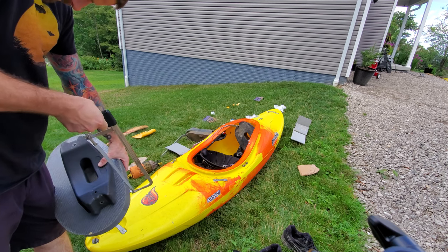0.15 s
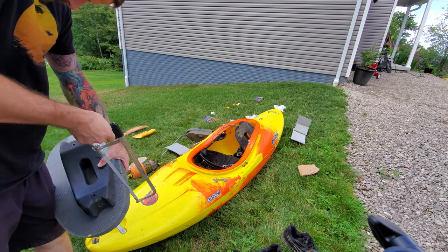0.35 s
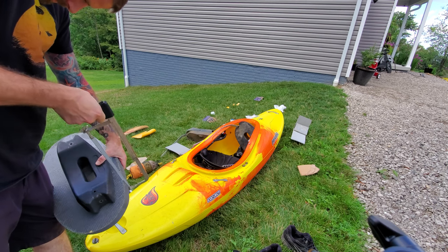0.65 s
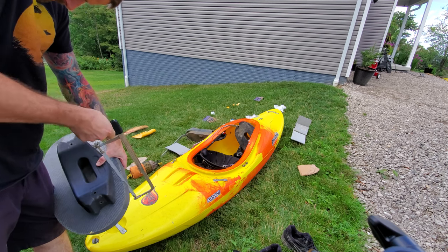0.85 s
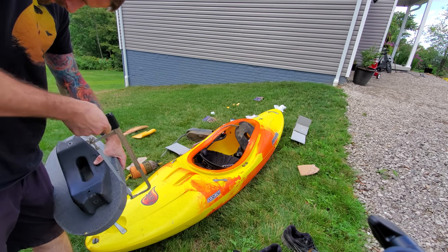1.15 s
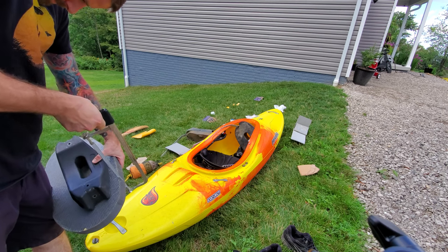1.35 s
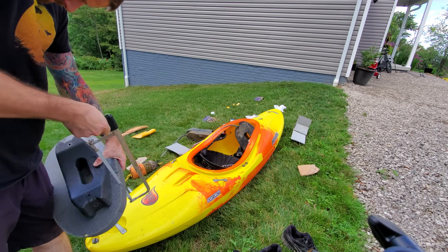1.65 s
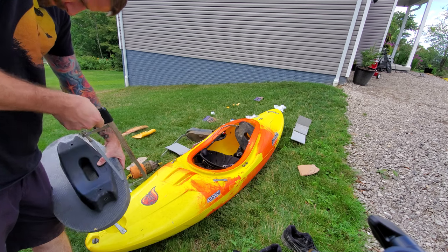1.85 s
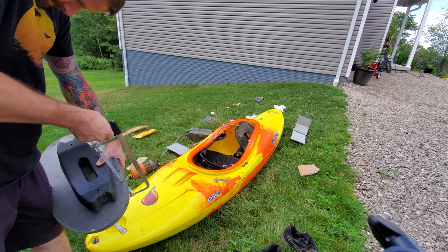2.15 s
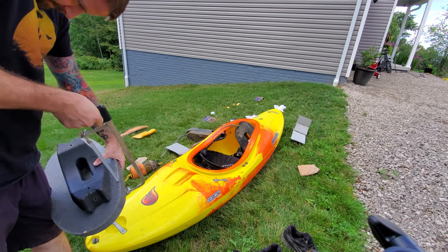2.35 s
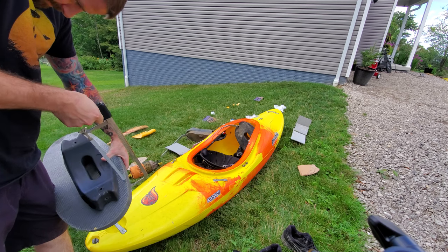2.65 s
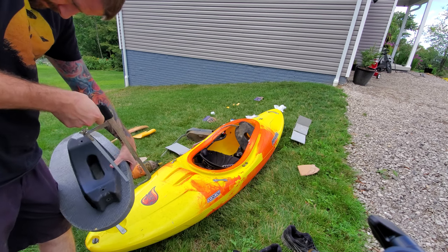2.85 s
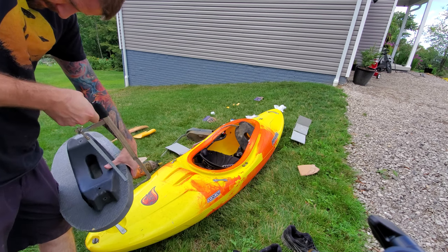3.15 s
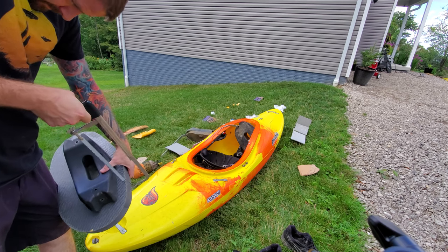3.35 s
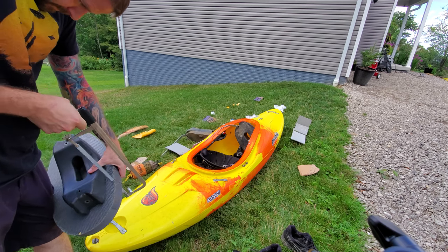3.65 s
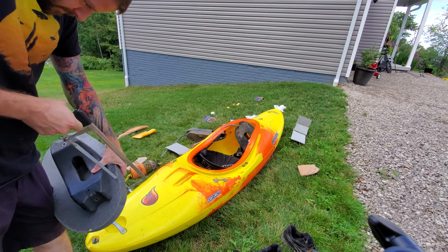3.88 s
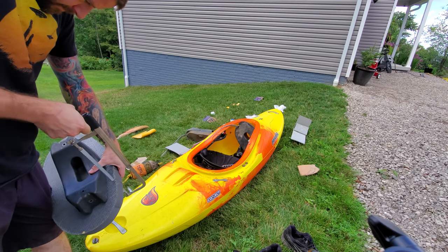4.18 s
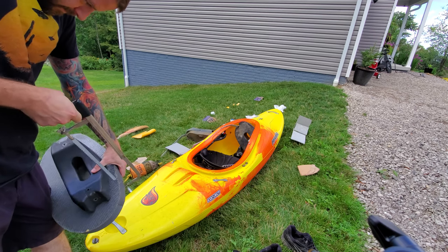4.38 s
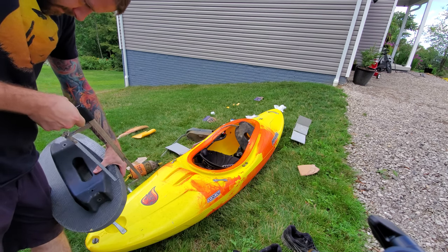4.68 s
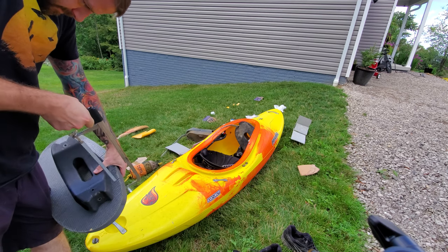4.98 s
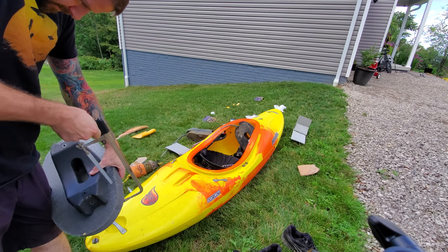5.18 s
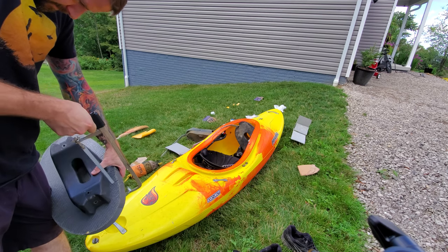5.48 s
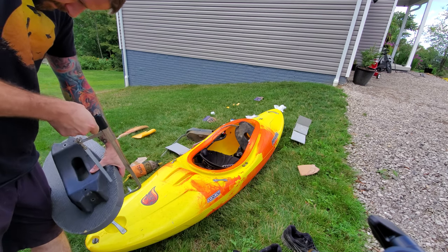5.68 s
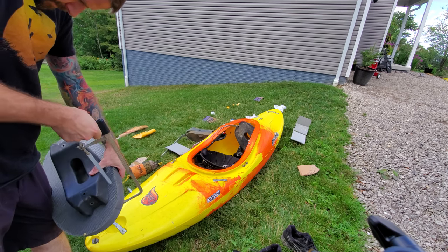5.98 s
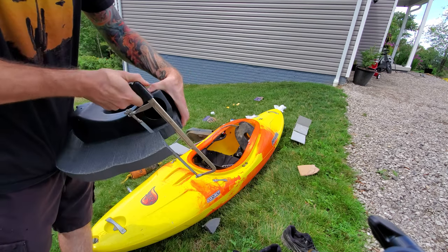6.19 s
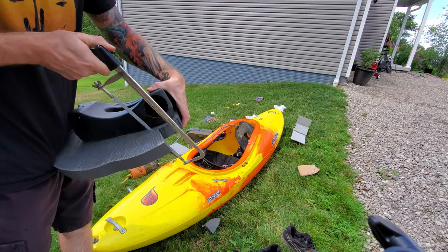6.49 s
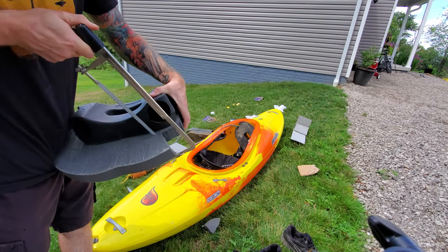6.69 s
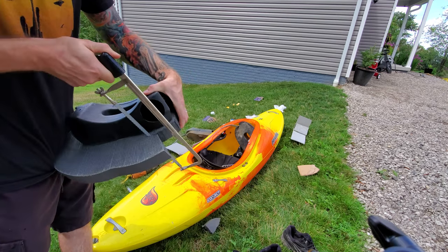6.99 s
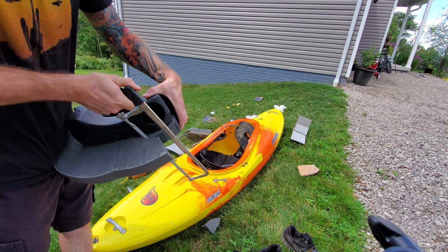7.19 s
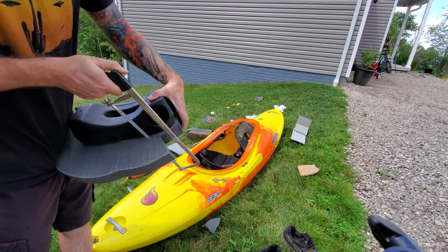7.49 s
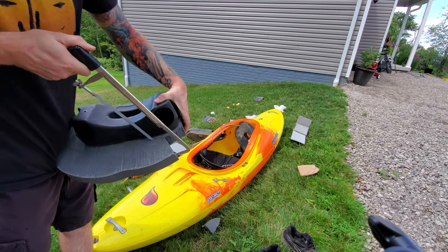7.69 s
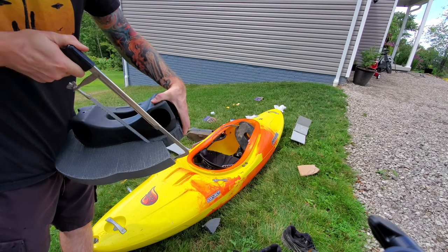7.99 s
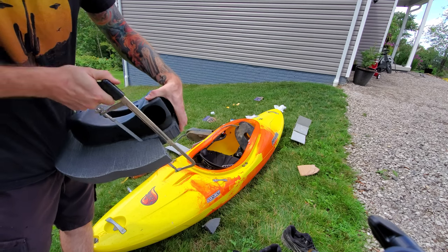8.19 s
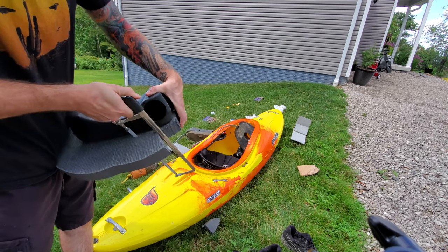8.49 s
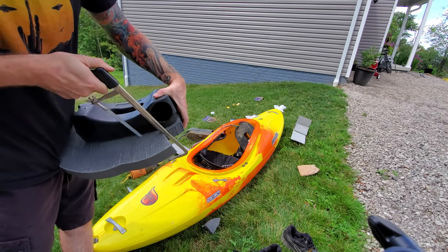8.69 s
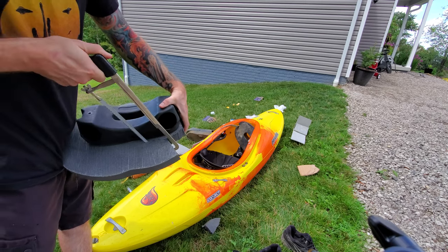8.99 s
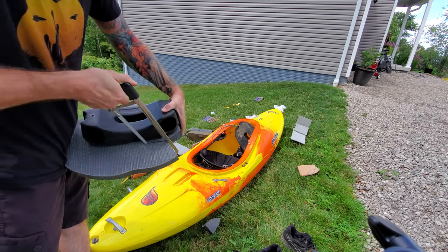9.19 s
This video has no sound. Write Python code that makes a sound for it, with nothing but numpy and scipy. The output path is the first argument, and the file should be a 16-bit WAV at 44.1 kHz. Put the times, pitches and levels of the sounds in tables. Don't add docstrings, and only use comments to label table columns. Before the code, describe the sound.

A hacksaw rasps through a hollow plastic block in quick strokes, pauses, resumes, then grinds slower and rougher with snapping chips and one short squeal.

```python
import sys
import numpy as np
from scipy import signal
from scipy.fft import rfft, irfft, next_fast_len
from scipy.io import wavfile
from scipy.ndimage import uniform_filter1d

SR = 44100
rng = np.random.default_rng(int(sys.argv[2]) if len(sys.argv) > 2 else 0)


def transcribe(u):
    v = np.clip(np.atleast_2d(u).T, -1, 1)
    q = np.round(v * 32767).astype(np.int16)
    wavfile.write(sys.argv[1], SR, q)


def attenuation_scalar(level_db):
    decades = np.asarray(level_db, float) / 20
    return 10 ** decades


N = 411894
TURNED_S = 6.1

# start_s, crest_s, end_s, hiss_db (chips), drone_db (block)
FIRST_BOUT = [(.026, 0.1, .176, -38.5, -33), (0.186, 0.289, .345, -33.5, -24),
              (0.455, 0.53, 0.5994, -35, -31), (0.653, 0.752, .805, -32.5, -26),
              (0.859, 0.932, 1.013, -35.5, -29.5), (1.038, 1.118, 1.19, -33, -26),
              (1.257, 1.38, 1.47, -39.5, -34.5), (1.523, 1.597, 1.665, -30, -25),
              (1.724, 1.801, 1.871, -35, -30.5), (1.937, 2.011, 2.085, -28, -23.5),
              (2.288, 2.354, 2.416, -35, -36)]
# start_s, crest_s, end_s, hiss_db, drone_db
SECOND_BOUT = [(3.47, 3.575, 3.721, -32, -31), (3.803, 3.885, 3.95, -36.5, -34),
               (4.022, 4.105, 4.161, -29, -28.5), (4.196, 4.285, 4.335, -28.5, -28),
               (4.355, 4.454, 4.505, -27, -28.5), (4.536, 4.625, 4.675, -33, -30.5),
               (4.722, 4.82, 4.868, -25.5, -30), (4.912, 4.96, 5.046, -37, -34.5),
               (5.07, 5.172, 5.22, -26, -29), (5.262, 5.341, 5.396, -35.5, -36.5),
               (5.411, 5.502, 5.555, -30, -32.5), (5.488, 5.557, 5.618, -27, -32),
               (5.661, 5.713, 5.791, -36.5, -40), (5.841, 5.917, 5.995, -33.5, -31)]
# start_s, crest_s, end_s, hiss_db, drone_db
TURNED_BOUT = [(6.301, 6.43, 6.49, -34.5, -30), (6.552, 6.637, 6.711, -26, -26.5),
               (6.868, 7.186, 7.26, -35, -32), (7.442, 7.53, 7.625, -29.5, -29),
               (7.557, 7.726, 7.785, -33.5, -29), (7.88, 8.299, 8.35, -33, -30.5),
               (8.458, 8.633, 8.675, -33.5, -34.5), (8.74, 8.778, 8.906, -34.5, -33.5),
               (9.122, 9.187, 9.29, -35, -31), (9.303, 9.341, 9.4, -26, -26)]


def evened(x):
    return x / np.sqrt(np.mean(x ** 2) + 1e-20)


def curve(rows, column=1):
    rows = np.array(rows)
    return np.interp(np.arange(N) / SR, rows[:, 0], rows[:, column])


def colour(x, points, share=1, late_ms=0):
    size = next_fast_len(N + 4096)
    hz = np.fft.rfftfreq(size, 1 / SR)
    point_hz, point_db = np.transpose(points)
    gain = attenuation_scalar(share * np.interp(np.log(hz + 1), np.log(np.add(point_hz, 1)), point_db))
    delay = np.exp(-2j * np.pi * hz * late_ms / 1000)
    return irfft(rfft(x, size) * gain * delay, size)[..., :N]


def ring(x, hz, width):
    return signal.lfilter(*signal.iirpeak(hz, hz / width, fs=SR), x)


def resonate(x, hz, width):
    turn = np.exp(2j * np.pi * np.cumsum(hz * np.ones(len(x))) / SR)
    r = np.exp(-np.pi * width / SR)
    return 2 * (turn * signal.lfilter([1 - r], [1, -r], x / turn)).real


def wander(seconds):
    size = max(round(seconds * SR), 1)
    smooth = uniform_filter1d(rng.standard_normal(N), size)
    return evened(uniform_filter1d(smooth, size))


def drifting(x, patchy_db):
    z = signal.stft(x, nperseg=256)[2]
    patches = rng.standard_normal(z.shape[-2:])
    patches = uniform_filter1d(patches, size=7, axis=0)
    patches = evened(uniform_filter1d(patches, size=14, axis=1))
    return signal.istft(z * attenuation_scalar(patchy_db * patches), nperseg=256)[1][..., :N]


def add(mix, s, sound):
    part = mix[round(s * SR):][:len(sound)]
    part += sound[:len(part)]


def stroke_levels():
    # attack_s, release_s, set_in_db, share of the crest already in the set-in (0-1), sag_db_per_s
    hiss_shapes = [
        (0.037, .04, -45.5, 0.27, 176),
        (.03, 0.043, -42, .3, 59.5),
        (.02, 0.045, -38, 0.19, 68),
    ]
    drone_shapes = [
        (0.029, 0.046, -37.5, 0.15, 137),
        (0.032, 0.048, -39.5, .4, 70),
        (0.021, 0.053, -34.5, 0.48, 50),
    ]
    # time_s, hiss_lift_db, drone_lift_db
    bites = [(0.049, -2.5, 6), (.285, 2.5, 1.5), (.885, 0, 4), (1.285, -3, -6), (1.14, -1, 3.5),
             (4.1, -1, 1.5), (4.381, 12, 3.5), (4.454, -1.5, 2.5), (4.62, 7.5, -1.5), (4.756, 8, 6.5),
             (5.01, 0.5, 7), (5.15, 0.5, 3.5), (5.177, 4, -1.5), (5.425, 8, -10), (5.474, 11.5, 1.5),
             (5.52, 3, 7), (5.755, -0.5, 9), (5.882, 10, 0.5), (5.947, 9.5, -7),
             (6.33, 0, 5.5), (6.443, 6, 11), (6.572, 2, 4), (6.892, 9, 4), (6.975, 8.5, 3.5),
                    (7.028, 3, 9), (7.065, 10, -2), (7.149, 1, 4.5), (7.193, 13, 5.5), (7.55, 6.5, 8),
                    (7.601, 4.5, 4), (7.638, 5, 2), (7.724, 8.5, 5.5), (7.926, 6.5, 2), (8.013, 9, 6.5),
                    (8.04, 3, 0.5), (8.12, -1, 8), (8.169, 11, 8), (8.216, 7, 5), (8.259, 0.5, 8.5),
                    (8.314, 17, 2), (8.535, -3, 7.5), (9.199, 8, 10)]
    start_db, end_db, silent_db = -59.5, -71.5, -86.5
    fade_s, bite_s = .004, 0.012
    t = np.arange(N) / SR
    levels_db = np.full((2, N), silent_db)
    for bout, *shapes in zip((FIRST_BOUT, SECOND_BOUT, TURNED_BOUT), hiss_shapes, drone_shapes):
        for start, crest, end, *crests_db in bout:
            held = (t > start - fade_s) & (t < end + fade_s)
            for k, (db, (attack, release, set_in_db, share, sag)) in enumerate(zip(crests_db, shapes)):
                begun = min(start + attack, crest - .001)
                ending = max(end - release, crest + .001)
                times = [start - fade_s, start, begun, crest, ending, end, end + fade_s]
                begun_db = set_in_db + share * (db - set_in_db)
                sagged_db = db - sag * (ending - crest)
                shape = [silent_db, start_db, begun_db, db, sagged_db, end_db, silent_db]
                stroke_db = np.interp(t[held], times, shape)
                levels_db[k, held] = np.maximum(levels_db[k, held], stroke_db)
    for s, *lifts_db in bites:
        near = abs(t - s) < 2 * bite_s
        levels_db[:, near] += np.outer(lifts_db, 1 - abs(t[near] - s) / (2 * bite_s))
    return attenuation_scalar(levels_db)


def blade_speed():
    # middle_s, half_length_s, top_tooth_rate_hz, evenness (0-1)
    singing = [(.105, .072, 980, .5), (0.529, .068, 1270, 0.49), (0.932, 0.068, 1300, 0.56),
               (1.345, .09, 730, .68), (1.793, 0.063, 1190, 0.53), (3.873, .065, 850, 0.46),
               (4.262, 0.056, 1040, .47), (4.975, .062, 920, 0.37), (5.719, .062, 910, 0.44),
               (6.372, 0.071, 1150, 0.39), (6.608, 0.044, 1300, 0.79), (7.503, 0.074, 1150, 0.5),
               (7.693, .07, 897, 0.54), (8.546, .08, 1200, 0.47)]
    teeth_per_stroke, arc_share, plain_evenness = 145., .45, 0.31
    creep_hz = 378
    t = np.arange(N) / SR
    rate_hz, evenness = np.full(N, creep_hz), np.zeros(N)
    plain = []
    for start, _, end, *_ in FIRST_BOUT + SECOND_BOUT + TURNED_BOUT:
        if not any(start < row[0] < end for row in singing):
            length = end - start
            plain.append(((start + end) / 2, arc_share * length, teeth_per_stroke / length, plain_evenness))
    for middle, half, top_hz, even in plain + singing:
        near = np.flatnonzero(abs(t - middle) < half)
        arc = top_hz * (1 - .72 * abs((t[near] - middle) / half) ** 1.6)
        faster = arc > rate_hz[near]
        won = near[faster]
        evenness[won] = even * np.where(t[won] < middle, .7, 1)
        rate_hz[won] = arc[faster]
    return rate_hz, np.clip(evenness, 0, 1)


def block(force):
    # pitch_hz, width_hz, level_db
    upright = [(406, 64, -0.5), (516.8, 39, 2), (641, 67, -5.5), (912, 326, -11), (1494, 226, -13.5),
               (1876, 180, -15.5), (494.4, 8.5, -8), (321, 60, -8)]
    # pitch_hz, width_hz, level_db
    turned = [(410, 54, 3.5), (501, 252, -8), (668, 183, -10), (1150, 97, -4.5), (1290, 320, -13.5),
              (2080, 150, -16.5)]
    # pitch_hz, width_hz, level_db
    slack = [(362, 90, -5.5), (533, 185, -6), (790, 290, -10.5), (1137, 160, -3), (1390, 410, -11),
             (1940, 253, -12)]
    # pitch_hz, width_hz, level_db
    lowered = [(472, 61.6, 4), (780, 365, -10.5), (475, 14, -4.5), (1150, 207, -5)]
    lowest = [
        255.,
        350.,
        290.,
    ]
    rested_s, slack_s, lowered_s = 3., 8.4, 9.
    t = np.arange(N) / SR
    poses = [(upright, 0, rested_s, lowest[0]), (upright, rested_s, TURNED_S, lowest[1]),
             (turned, TURNED_S, slack_s, lowest[2]), (slack, slack_s, lowered_s, lowest[2]),
             (lowered, lowered_s, N / SR, lowest[2])]
    halves = np.zeros((2, N))
    for modes, since, until, lowest_hz in poses:
        held = (t >= since) & (t < until)
        push = signal.sosfilt(signal.butter(4, lowest_hz, "high", fs=SR, output="sos"), force[held])
        for k, (hz, width, db) in enumerate(modes):
            halves[k % 2, held] += attenuation_scalar(db) * ring(push, hz, width)
    even, odd = halves
    lean = 0.11 * np.array([even + odd, -even - odd])
    return even - odd, lean


def saw():
    # pitch_hz, level_db
    hiss_upright = [(600, -19), (1700, -17), (2500, -7.5), (3500, -4.5), (4800, -7), (6500, -4),
                    (8000, -15.5), (11000, -8), (14500, -7.5), (16000, -3)]
    # pitch_hz, level_db
    hiss_turned = [(600, -21), (1500, 2.5), (2500, 0.5), (3400, 6.5), (4800, 2), (6500, 3.5), (8000, -3),
                   (11000, -3.5), (14500, 4), (16000, 2)]
    hiss, drone = stroke_levels()
    rate_hz, evenness = blade_speed()
    teeth = np.cumsum(rate_hz * (1 + .08 * wander(0.00384))) / SR
    catches = np.cos(2 * np.pi * teeth) + .3 * np.cos(4 * np.pi * teeth)
    catches = catches * attenuation_scalar(3. * wander(.006))
    tearing = rng.standard_normal(N) * attenuation_scalar(1.82 * wander(0.0073))
    force = 1.17 * evenness * catches + 3.25 * (1 - evenness) * tearing
    body, lean = block(attenuation_scalar(8.0) * drone * force)

    puffs = 1 + 0.25 * np.cos(2 * np.pi * teeth)
    puffs = puffs * attenuation_scalar(1.36 * wander(0.0048) + 0.9 * wander(0.0071))
    chips = drifting(rng.standard_normal((3, N)) * puffs, patchy_db=3.2)
    chips += 0.4 * ring(chips, 3390.0, 640.0)
    turned = np.arange(N) > TURNED_S * SR
    chips = hiss * np.where(turned, evened(colour(chips, hiss_turned)), evened(colour(chips, hiss_upright)))
    along_blade = colour(chips[1:], [(400, -5), (9000, -4.0)]) * attenuation_scalar([[5.], [1.5]])
    return body + chips[0], along_blade + lean


def rumble():
    # time_s, level_db
    rumble_level = [(0, -56.5), (3.4, -59.5), (6.22, -56.5), (6.3, -45), (6.6, -55), (7., -52),
                    (7.2, -37.5), (7.45, -47.5), (7.85, -56.5), (8.05, -44.5), (8.5, -53), (8.85, -47.5),
                    (9., -58), (9.3, -46)]
    # pitch_hz, level_db
    rumble_colour = [(12, -33), (20, -28.5), (54, 0), (81, 0), (122, -4), (166, -13.5), (311, -23.5),
                     (400, -24.5), (520, -55), (880, -120)]
    a, b = rng.standard_normal((2, N))
    pair = np.array([a + 0.28 * b, a - 0.26 * b])
    return evened(colour(pair, rumble_colour)) * attenuation_scalar(curve(rumble_level))


def rustle():
    # start_s, length_s, level_db
    rubs = [(2.104, 0.14, -68.5), (2.455, .4, -87), (2.675, .13, -66.5), (2.988, 0.2, -68.5),
            (2.996, 0.069, -64), (3.135, 0.033, -62), (6.097, 0.19, -67), (6.469, 0.075, -74),
            (6.68, 0.19, -73), (6.835, 0.038, -56), (8.337, 0.15, -60.5), (7.246, 0.2, -62),
            (8.997, 0.077, -64.5)]
    # pitch_hz, level_db
    rustle_colour = [(150, -31), (300, -17.5), (800, -7), (1900, -13), (2900, -9.5), (3600, -11),
                     (6900, -10), (7600, -16), (12000, -17.5), (15500, -15.5)]
    a, b = rng.standard_normal((2, N))
    pair = drifting(np.array([a, .5 * np.roll(a, 9) + .8 * b]), patchy_db=-2.2)
    level = np.full(N, attenuation_scalar(-70.0))
    for s, length, db in rubs:
        add(level, s, attenuation_scalar(db) * signal.windows.tukey(round(length * SR), .7))
    return evened(colour(pair, rustle_colour)) * level * attenuation_scalar([[3.], [.5]])


def snaps():
    # time_s, peak_db, ring_hz
    breaking_chips = [(1.6121, -6, 3800), (2.016, -6, 3300), (2.701, -33.5, 5000), (3.4805, -31, 3558),
                      (4.3676, -21, 6100), (4.3791, -6, 3270), (4.74, -15.5, 3500), (4.7683, -8, 3550),
                      (5.42, -24, 5700), (5.467, -17, 3230), (5.838, -34, 3513),
                      (6.3125, -25, 6600), (6.5635, -14, 5840), (6.8892, -16, 3100), (6.9984, -10, 3380),
                    (7.0022, -3, 3670), (7.0454, -7.5, 5530), (7.1081, -3.5, 3660), (7.146, -14, 5100),
                    (7.178, -15.5, 5150), (7.1844, -5.5, 3400), (7.453, -32, 5210), (7.9248, -5, 3770),
                    (8.012, -8, 3840), (8.0594, -8, 3800), (8.1116, -4, 3720), (8.1311, -10, 3670),
                    (8.165, -10.5, 3730), (8.1838, -6.5, 3600), (8.2109, -8.5, 3630), (8.2144, -17, 3580),
                    (8.2283, -8, 3600), (8.2536, -6.5, 3480), (8.2738, -11, 3440), (8.2779, -4, 3420),
                    (8.2948, -9, 3270), (8.758, -19, 3920), (9.1339, -11, 4320), (9.195, -2, 3300),
                    (9.3142, -18, 5500), (9.3317, -12, 4080),
                      (0.2834, -16, 4000), (2.145, -47, 3530), (2.1695, -33, 6370), (2.9057, -44, 6540),
             (3.142, -43.5, 3650), (4.6897, -33.5, 6000), (4.7664, -8, 3364), (6.1194, -31, 3760),
             (6.506, -34, 6135), (7.2778, -33, 3840), (7.9197, -14, 3763), (8.2138, -7, 3600),
             (8.1655, -8.5, 3630), (5.5007, -10, 3580), (5.1483, -14, 3270), (8.7924, -15, 2923),
             (9.0329, -39.5, 3300), (9.105, -39, 4670), (9.2394, -28, 2558)]
    events = breaking_chips
    out, t = np.zeros(N), np.arange(900) / SR
    ring_fade = attenuation_scalar(-60 * t / .003) + .3 * attenuation_scalar(-60 * t / .012)
    crack_fade = attenuation_scalar(-60 * t / .002) + 0.15 * attenuation_scalar(-60 * t / 0.032)
    for (s, db, hz), crack in zip(events, rng.standard_normal((len(events), len(t)))):
        tone = np.sin(2 * np.pi * hz * t) * ring_fade
        snap = tone * (1 - np.exp(-t / 0.00016)) + 1.19 * np.tanh(crack) * crack_fade
        snap[6:8] += 2., -1.
        add(out, s + 0.000989, attenuation_scalar(db + 5.0) * snap / abs(snap).max())
    push = signal.oaconvolve(np.abs(out), np.exp(-t / .0004))[:N]
    shaken = 0.05 * (ring(push, 1300, 90) + ring(push, 420, 47))
    return colour(out, [(500, -29.0), (2200, 2.5), (3500, 0.0), (8000, -2.0), (14000, 0)]) + shaken


def knocks():
    # time_s, level_db, pitch_hz, fade_s (to drop 60 dB)
    grip_knocks = [
        (6.264, -33.5, 344, 0.083),
        (6.119, -49.5, 498, 0.091),
        (7.055, -21.5, 128, 0.14),
        (7.2, -25.5, 333, 0.12),
        (7.279, -25.5, 333, 0.085),
        (7.358, -33, 335, .1),
        (7.43, -39.5, 350, 0.07),
        (9.035, -42, 453, 0.16),
    ]
    out, t = np.zeros(N), np.arange(12000) / SR
    low_band = signal.butter(3, [70., 600.], "band", fs=SR, output="sos")
    for (s, db, hz, t60), noise in zip(grip_knocks, rng.standard_normal((len(grip_knocks), len(t)))):
        scuff = evened(signal.sosfilt(low_band, noise))
        thud = attenuation_scalar(db - 60 * t / t60) * np.sin(2 * np.pi * hz * t)
        thud = thud + 0.37 * attenuation_scalar(db - 60 * t / (2.15 * t60)) * scuff
        add(out, s, thud * (1 - np.exp(-t / 0.0034)))
    return out


def squeal():
    # time_s, level_db, pitch_hz
    shriek = [
        (8.28, -41, 3200),
        (8.297, -14, 3280),
        (8.31, -37, 2740),
        (8.325, -40, 2600),
    ]
    noise, hz = rng.standard_normal(N), curve(shriek, column=2)
    tones = evened(resonate(noise, hz, 150.)) + 0.64 * evened(resonate(noise, 2 * hz, 250.))
    before, after = (shriek[0][0] - .01, -120, 0), (shriek[-1][0] + 0.02, -120, 0)
    return attenuation_scalar(curve([before, *shriek, after])) * tones


def yard(x):
    # pitch_hz, level_db
    left_over_right = [(60, 0), (200, 2), (500, 2.5), (1500, 4), (4000, 4.5), (8000, 2.5), (14000, 4)]
    lead_upright_ms, lead_turned_ms = 0.2187, 0.18
    turned = np.arange(N) > TURNED_S * SR
    left = colour(x, left_over_right, share=1 / 2)
    late = [(~turned, lead_upright_ms), (turned, lead_turned_ms)]
    right = sum(colour(x * held, left_over_right, -1 / 2, ms) for held, ms in late)
    direct = np.array([left, right])
    t = np.arange(6000) / SR
    taps = rng.standard_normal((2, len(t))) * attenuation_scalar(-60 * t / 0.14) * (t > .003)
    echoes = signal.oaconvolve(direct, taps / np.linalg.norm(taps[0]), axes=1)[:, :N]
    return direct + attenuation_scalar(-14.5) * echoes


def scene():
    cut, along_blade = saw()
    near = cut + snaps() + knocks() + squeal()
    return yard(near) + along_blade + rustle() + rumble()


def low_pass(x):
    return signal.sosfilt(signal.butter(12, 17000, fs=SR, output="sos"), x)


def record(dry):
    # pitch_hz, level_db
    band_edge = [(15750, 0), (16000, -26), (16900, -28), (17020, -90)]
    held = dry / (1 + (dry / .85) ** 6) ** (1 / 6)
    return low_pass(colour(held, band_edge))


dry = scene()
out = record(dry)
transcribe(out)
```